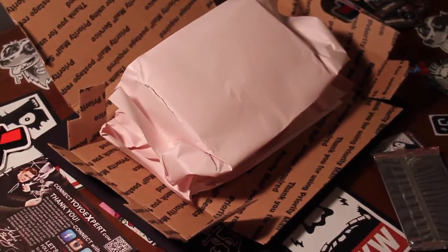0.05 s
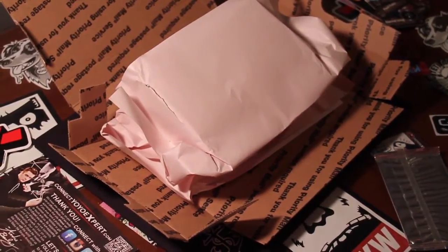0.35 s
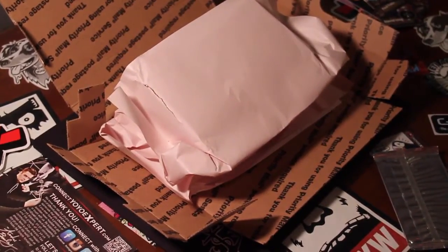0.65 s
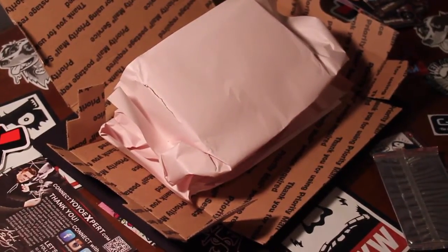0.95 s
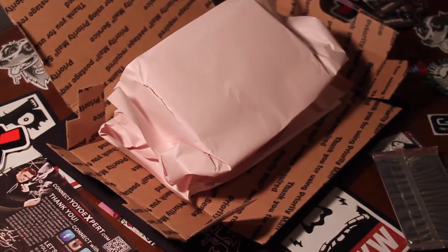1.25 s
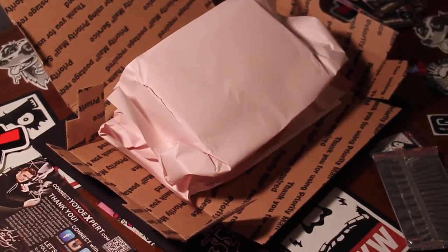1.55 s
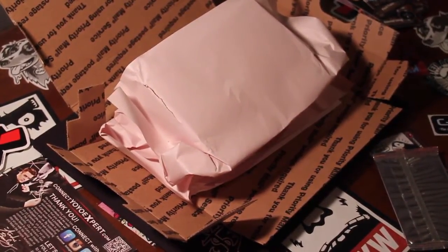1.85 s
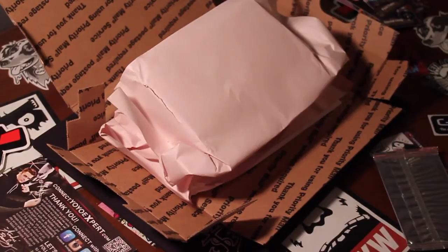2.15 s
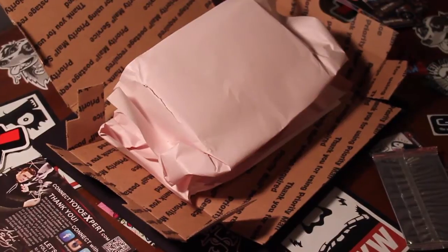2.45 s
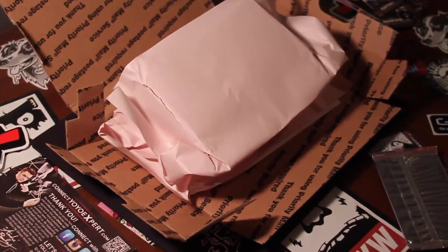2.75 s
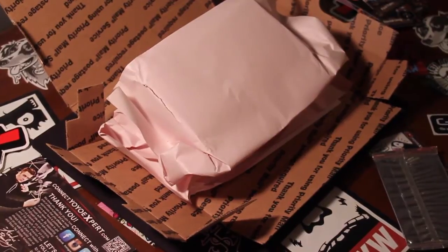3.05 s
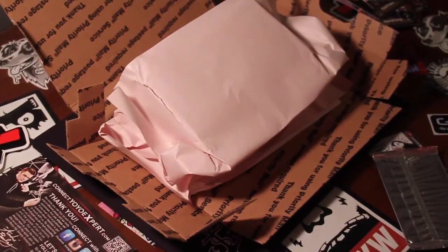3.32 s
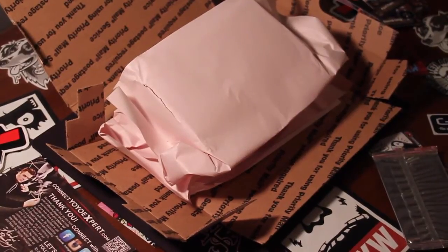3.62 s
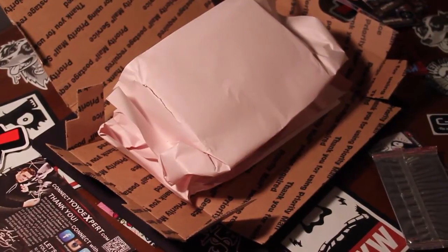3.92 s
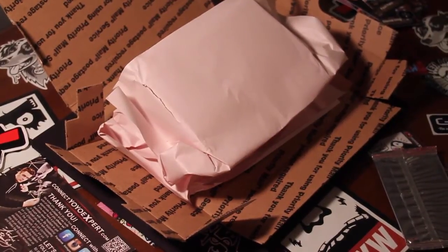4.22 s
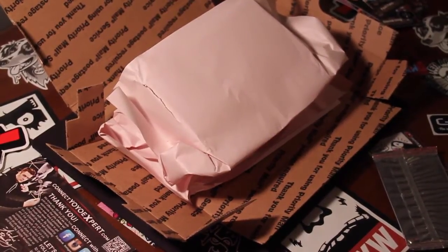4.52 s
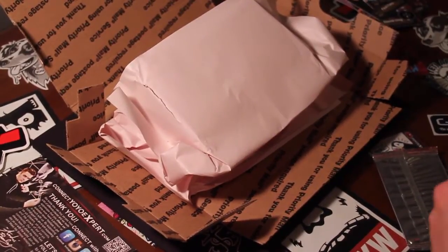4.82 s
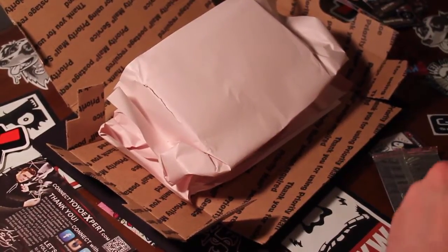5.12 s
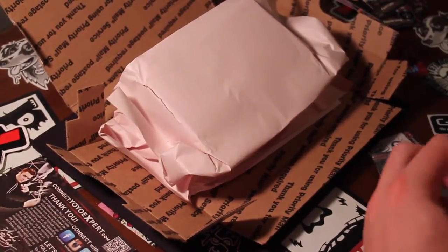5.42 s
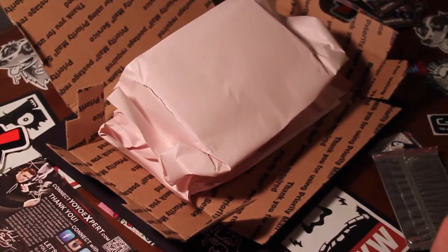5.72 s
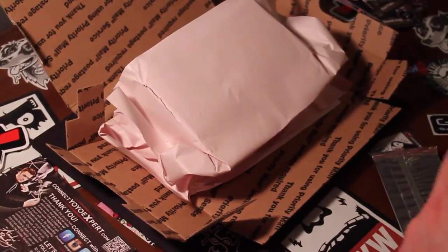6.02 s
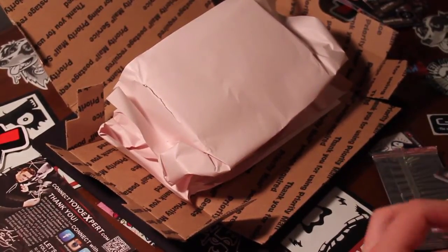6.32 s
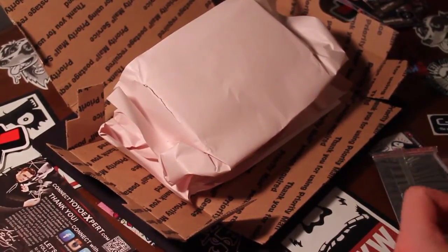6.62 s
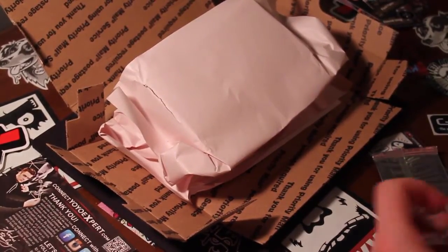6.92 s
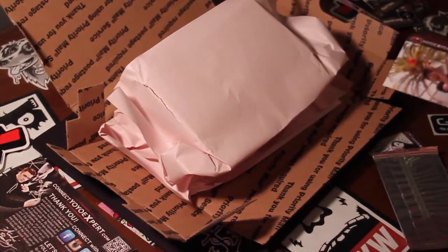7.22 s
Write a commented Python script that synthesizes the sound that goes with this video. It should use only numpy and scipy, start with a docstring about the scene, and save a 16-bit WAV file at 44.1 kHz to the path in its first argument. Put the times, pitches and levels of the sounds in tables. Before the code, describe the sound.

Stiff cards are handled close up, snapping, ticking and sliding over each other, sparse at first and then busy, in a quiet room.

```python
"""Stiff cards are picked up, tapped together and slid over each other above a table, heard close up.
Their edges snap free, their corners tick, and their faces rub in short strokes with a gritty hiss,
all made of tiny slips of fibre on fibre. Once a fingertip squeaks, and once the stack knocks on the table.
A small, quiet room with a soft steady whirr answers every click."""
import sys
import numpy as np
from scipy import signal
from scipy.fft import rfft, irfft
from scipy.io import wavfile
from scipy.ndimage import uniform_filter1d

SR = 44100
rng = np.random.default_rng(int(sys.argv[2]) if len(sys.argv) > 2 else 0)


def waveform_to_disk(signal):
    """Save audio, clipped to [-1, 1], as 16-bit WAV at the path in sys.argv[1]."""
    frames = np.transpose(np.atleast_2d(signal))
    scaled = np.clip(frames, -1, 1) * 32767
    samples = np.round(scaled).astype(np.int16)
    wavfile.write(sys.argv[1], SR, samples)


N = 320027
TIME = np.arange(N) / SR
TREBLE_LIMIT_HZ = 15950


def amp(db):
    """Turns decibels into a number to multiply a sound by."""
    return 10 ** (np.asarray(db) / 20)


def evened(x):
    """Scales a signal so that its average strength (rms) is 1."""
    return x / np.sqrt(np.mean(x ** 2) + 1e-20)


def level_at(points, hz):
    """Reads between the rows of a (frequency, level) table, giving each octave equal room."""
    row_hz, row_db = np.transpose(points)
    return np.interp(np.log(hz + 1), np.log(row_hz + 1), row_db)


def bump(hz, centre_hz, width_hz):
    """A peak of height 1 around the pitch at which something rings."""
    return 1 / (1 + (2 * (hz - centre_hz) / width_hz) ** 2)


def add(mix, start_s, sound):
    """Mixes a sound in at the given time."""
    part = mix[max(0, round(start_s * SR)):][:len(sound)]
    part += sound[:len(part)]


def resonate(x, hz, lift_db, sharpness):
    """Turns a sound up around one pitch, so that it rings there (or down, if the lift is negative)."""
    return x + (amp(lift_db) - 1) * signal.lfilter(*signal.iirpeak(hz, sharpness, SR), x)


def tinted(body, face, bass_db, treble_db):
    """Takes the bass from the stack's body, and the middle and treble from the card's face."""
    bands = [(body, 1200, "low", bass_db), (face, [1200, 6000], "band", 0), (face, 6000, "high", treble_db)]
    out = 0
    for sound, edge_hz, kind, db in bands:
        band = signal.butter(3, edge_hz, kind, fs=SR, output="sos")
        share = np.linalg.norm(signal.sosfilt(band, signal.unit_impulse(256)))  # its part of an even hiss
        out = out + evened(signal.sosfilt(band, sound)) * share * amp(db)
    return out


def short_burst(x):
    """Gives a burst of strength 1 the energy of 10 ms of sound at that strength."""
    return x * np.sqrt(SR / 100 / len(x))


def grit(shape, spread_db):
    """Tiny slips of fibre on fibre: mostly small, a few large."""
    return evened(rng.standard_normal(shape) * amp(spread_db * np.clip(rng.standard_normal(shape), -2, 2)))


def air(level_db=-52, whirr_hz=1000, whirr_db=11, hum_hz=580, hum_db=9):
    """The steady hiss of the room, with a narrow whirr and a faint hum in it."""
    # tone of the quiet room: (frequency [Hz], relative level [dB])
    room_tone = [(30, -20.5), (140, -11), (380, -14.5), (570, -12), (900, -6), (1350, -14.5), (2800, -18.5),
                 (16000, -25)]
    hz = np.fft.rfftfreq(N, 1 / SR)
    whirr = whirr_db * bump(hz, whirr_hz, width_hz=130)
    hum = hum_db * bump(hz, hum_hz, width_hz=14)
    colour = amp(level_at(room_tone, hz) + whirr + hum)
    return amp(level_db) * evened(irfft(rfft(rng.standard_normal(N)) * colour, N))


def room(x, tail_db=-8.5, bass_fade_s=0.6, treble_fade_s=0.35):
    """The small room stores the energy at each pitch and lets it die away as a wash of noise."""
    hz, t, spectrum = signal.stft(x, SR, nperseg=256)
    power = np.pad(abs(spectrum) ** 2, ((0, 0), (2, 0)))[:, :len(t)]  # the room answers two steps late
    fade_s = np.interp(hz, [0, TREBLE_LIMIT_HZ], [bass_fade_s, treble_fade_s])  # time to fall 60 dB
    kept_per_step = amp(-120 * t[1] / fade_s)
    stored = np.array([signal.lfilter([1 - kept], [1, -kept], p) for kept, p in zip(kept_per_step, power)])
    noise = signal.stft(rng.standard_normal(N), SR, nperseg=256)[2]
    tail = signal.istft(np.sqrt(abs(stored)) * noise / noise.std(), SR)[1][:N]
    return x + amp(tail_db) * tail


def echoes(x, bounce_s=0.0021, bounce_gain=0.11, scatter_db=-9, scatter_s=0.012, patterns=4):
    """Sound bounces off the table and scatters from things nearby; the pattern changes as cards move."""
    t, out = np.arange(SR // 20) / SR, x
    for k in range(patterns):
        # each pattern blends into the next, three times a second
        blend = np.cos(np.pi / 2 * np.minimum(abs((TIME * 3 - k) % patterns - 1), 1))
        scatter = rng.standard_normal(len(t)) * np.exp(-(t / scatter_s) ** 2 / 2) * (t > bounce_s)
        response = amp(scatter_db) * scatter / np.linalg.norm(scatter)
        delay_s = bounce_s * 2 ** rng.uniform(-0.25, 0.25)
        response[round(delay_s * SR)] += bounce_gain
        out = out + signal.oaconvolve(x * blend, response)[:N]
    return out


def cards_and_table(force, size=8192):
    """The cards and the table top ring with whatever shakes them, and so colour its sound."""
    # overall tone of the cards: (frequency [Hz], relative level [dB])
    card_tone = [(50, -31), (120, -23), (165, -21), (330, -12), (507, -11), (630, -11), (694, -7),
                 (1050, -6), (3850, 3), (7760, -4), (12000, -0.5), (14500, -2.5), (16000, -14.5)]
    # pitches at which the table top rings: (frequency [Hz], width [Hz], lift [dB])
    table_rings = [(129, 12, 7.5), (500, 55, 4), (714, 22, 7), (1135, 55, 6.5)]
    hz = abs(np.fft.fftfreq(size, 1 / SR))
    ring_db = sum(lift * bump(hz, centre, width) for centre, width, lift in table_rings)
    log_gain = np.log(evened(amp(level_at(card_tone, hz) + ring_db)))
    # build a filter that rings only after each push, never before it
    response = np.fft.ifft(np.exp(np.conj(signal.hilbert(log_gain)))).real
    return signal.oaconvolve(force, response[:size // 2])[:N]


def squeak(start_s=0.9, length_s=0.21, from_hz=11100, to_hz=13600, width_hz=650, stutter_db=5,
           level_db=-65):
    """A thin, stuttering whistle of skin on card that rises as the finger speeds up."""
    along, out = np.linspace(0, 1, round(length_s * SR)), np.zeros(N)
    hz = from_hz + (to_hz - from_hz) * along
    flutter_noise, grip_noise = rng.standard_normal((2, N))[:, :len(along)]
    flutter = signal.sosfilt(signal.butter(2, width_hz / 2, fs=SR, output="sos"), flutter_noise)
    stutter = amp(stutter_db * evened(uniform_filter1d(grip_noise, size=900)))
    whistle = np.sin(2 * np.pi * np.cumsum(hz) / SR)
    swell = np.sqrt(abs(np.sin(np.pi * along)))
    add(out, start_s, amp(level_db) * evened(flutter * stutter * whistle * swell))
    return out


def knock(start_s=3.5112, thud_db=-16, slap_db=-11, landing_s=0.0076, settle_s=0.0063, low_cut_hz=190):
    """The stack lands: the table thuds while the cards slap down in a short burst and lie still."""
    # ringing of the knocked table and stack: (frequency [Hz], relative level [dB], time to fall 60 dB [s])
    thud_tones = [(266, -10, 0.042), (527, 6, 0.012), (1240, 9, 0.01), (1830, -1, 0.061), (2350, 8, 0.017),
                  (3080, 8, 0.022)]
    t, thud, slap = np.arange(SR // 4) / SR, np.zeros(N), np.zeros(N)
    ring = sum(amp(db - 60 * t / fade_s) * np.sin(2 * np.pi * hz * t) for hz, db, fade_s in thud_tones)
    add(thud, start_s, -amp(thud_db) * ring)
    blows = rng.standard_normal(len(t)) * np.exp(-np.maximum(t - landing_s, 0) / settle_s)
    add(slap, start_s, amp(slap_db) * short_burst(tinted(blows, blows, bass_db=5, treble_db=-1)))
    low_cut = signal.butter(2, low_cut_hz, "high", fs=SR, output="sos")
    return signal.sosfilt(low_cut, room(thud + cards_and_table(slap), tail_db=-17))


def ticks(rise_s=0.00033, decay_s=0.0064, typical_hz=3000):
    """A corner or fingernail brushes past: a few dry slips, faintly coloured by where it touches."""
    # light touches on a card: (time [s], level [dB], treble [dB])
    touches = [(0.401, -37, 8), (0.672, -37.5, -9), (0.708, -44.5, -5), (0.777, -39.5, -14),
               (1.18, -26.5, 0), (1.189, -36, -13), (1.345, -41.5, -8), (1.404, -39, -17),
               (1.452, -44.5, 9.5), (1.781, -36.5, -12), (1.821, -46.5, 3), (2.817, -54, 14),
               (2.919, -46, -2), (3.101, -38.5, -7), (3.252, -19.5, -13), (3.34, -22, -9), (3.54, -20.5, 1),
               (3.82, -31.5, 12), (3.854, -29, -1), (3.88, -26.5, -10), (3.925, -31, -16),
               (3.964, -27.5, 2), (4.107, -21, -4), (4.18, -19, 0), (4.229, -22, -2), (4.251, -15, -4.5),
               (4.382, -33, 6), (4.454, -27, -5), (4.53, -25, -6), (4.614, -19, -5), (4.645, -24, 1),
               (4.753, -25.5, -2), (4.765, -19.5, 1), (4.816, -19.5, -1), (4.879, -25.5, 0.5),
               (4.901, -20, 2.5), (4.983, -22, 0), (5.144, -29, 3), (5.534, -28.5, 6.5),
               (5.548, -23.5, 2.5), (5.66, -35.5, 8.5), (5.809, -29.5, 1), (5.819, -22.5, 3.5),
               (6.37, -24.5, 1), (6.479, -26.5, 1), (6.49, -20.5, -0.5), (6.543, -26, -1.5),
               (6.575, -32.5, 5), (6.793, -26, -1), (6.828, -29, -9), (6.896, -26.5, 4.5),
               (7.232, -27.5, 2.5)]
    t, out = np.arange(SR // 20) / SR, np.zeros(N)
    pitches = typical_hz * 2 ** rng.uniform(-1.1, 1, len(touches))
    grits = grit((len(touches), len(t)), spread_db=4)
    for (start, db, treble_db), hz, fibres in zip(touches, pitches, grits):
        slips = fibres * np.minimum(t / rise_s, 1) * np.exp(-t / decay_s)
        face = resonate(slips, hz, lift_db=5, sharpness=2.1)
        add(out, start, amp(db) * short_burst(tinted(slips, face, bass_db=-3, treble_db=treble_db)))
    return out


def flex(x, patchy_db):
    """Bending cards change their tone in passing patches as the place where they touch shifts."""
    spectrum = signal.stft(x, SR, nperseg=256)[2]
    across_pitch = uniform_filter1d(rng.standard_normal(spectrum.shape), size=7, axis=0)
    patches = evened(uniform_filter1d(across_pitch, size=9, axis=1))
    return evened(signal.istft(spectrum * amp(patchy_db * patches), SR)[1][:N])


def rubbing(slow_judder_db=3, glide_judder_db=1, catches_per_s=200, catch_db=-6, glide_above_db=-20,
            attack_s=0.0076, release_s=0.012, low_cut_hz=290, gain_db=0.5):
    """Card slides on card: slow strokes judder and catch, while fast ones glide with a more even hiss."""
    # strokes of one face over another: (start [s], length [s], level [dB], swell from start to end [dB],
    # bass [dB], treble [dB], pitch turned up or down [Hz], lift at that pitch [dB])
    strokes = [(0, 0.055, -37.5, -7, 0.5, -2.5, 1840, 8), (0.072, 0.18, -45, -5, 13, -0.5, 2570, 5),
               (0.333, 0.047, -46.5, -3, -8, -1.5, 3550, 2), (0.418, 0.29, -55.5, -15, -2, 6, 6960, -4),
               (1.093, 0.14, -45.5, 11, -1, 2, 1400, 9), (3.035, 0.135, -52.5, 12, -6, 4.5, 13000, 4),
               (3.18, 0.046, -14.5, -4, 0.5, 2, 1680, 3.5), (3.237, 0.14, -30.5, 14, 4.5, -2, 5700, 0.5),
               (3.388, 0.24, -37.5, 3, 7, -10, 1310, 10), (3.793, 0.16, -43.5, -4, 9, 4, 2820, 5),
               (3.99, 0.31, -28.5, 0.5, 5, -4, 1630, 7), (4.347, 0.06, -25.5, -7, 0, -2.5, 1440, 17),
               (4.439, 0.39, -36, 5, 7.5, -7, 3770, -2), (4.97, 0.09, -30.5, 19, 3.5, -7, 2450, 0),
               (5.156, 0.038, -16.5, 11, 0.5, 0, 5350, 2.5), (5.203, 0.19, -20.5, -5.5, -3, 4, 5960, 3.5),
               (5.608, 0.13, -37, -6, 9.5, 2.5, 1440, 0), (5.857, 0.082, -24.5, 4.5, 3, 0, 2980, 14),
               (5.947, 0.082, -16, 7, -13, -3, 2600, 4.5), (6.034, 0.063, -16, 0.5, -3.5, -0.5, 4900, 6.5),
               (6.105, 0.13, -18, -1.5, 5, 1.5, 5050, 0.5), (6.418, 0.13, -31, -3, 8, 1.5, 6400, -4),
               (6.605, 0.26, -43, -27, 4, -1, 3600, 1), (6.854, 0.14, -28.5, 17.5, 6, -1.5, 5400, 0.5),
               (7.072, 0.063, -34.5, 0.5, 1, 5.5, 7060, 1.5)]
    judder = evened(uniform_filter1d(uniform_filter1d(rng.standard_normal(N), size=260), size=110))
    catches = evened((rng.random(N) < catches_per_s / SR) * np.clip(rng.standard_normal(N), -2, 2))
    fibres = flex(grit(N, spread_db=3), patchy_db=4)
    hiss = flex(grit(N, spread_db=3), patchy_db=1.8)
    out = np.zeros(N)
    for start, length, db, swell_db, bass_db, treble_db, hz, ring_db in strokes:
        span = slice(round(start * SR), round((start + length + 10 * release_s) * SR))
        t = TIME[span] - start
        along = np.clip(t / length, 0, 1)
        letting_go = np.exp(-np.maximum(t - length, 0) / release_s)
        force = np.minimum(t / attack_s, 1) * amp(db + swell_db * (along - 0.5)) * letting_go
        sticking = 1 / (1 + amp(db + treble_db - glide_above_db) ** 2)  # loud, bright strokes stick less
        crinkle = evened(fibres[span] * amp(slow_judder_db * judder[span])) + amp(catch_db) * catches[span]
        glide = hiss[span] * amp(glide_judder_db * judder[span])
        slips = np.sqrt(sticking) * crinkle + np.sqrt(1 - sticking) * glide
        face = resonate(slips, hz, ring_db, sharpness=3.8)
        add(out, start, force * tinted(slips, face, bass_db, treble_db))
    return amp(gain_db) * signal.sosfilt(signal.butter(1, low_cut_hz, "high", fs=SR, output="sos"), out)


def snaps(creep=0.26, creep_s=0.014, base_contact_s=0.0011, chatter=0.63, chatter_s=0.012, hollow_hz=490):
    """A card's edge creeps, lets go in a burst of slips, then rattles until the fingers still it."""
    # edges snapping free: (time [s], level [dB], bass [dB], treble [dB],
    # pitch around which the snap is boosted [Hz])
    edge_snaps = [(0.06, -23.5, -0.5, -6, 1270), (0.181, -27.5, 4.5, -26, 1800),
                  (0.19, -31, -2, -7.5, 1310), (0.468, -25, -13, -1, 7050), (0.898, -36, 4, -14, 1350),
                  (1.203, -25, -6, 2, 6900), (2.092, -20, 1.5, 1, 1700), (2.279, -27, -1.5, -14.5, 1770),
                  (3.181, -17, -7, 3, 6900), (3.225, -12.5, 0, -7, 1660), (3.391, -25, 5.5, -5, 3800),
                  (3.946, -24.5, 2, -9, 1300), (3.972, -19.5, 8, -3.5, 1340), (4.023, -11.5, -18, -5, 1630),
                  (4.069, -11.5, 0.5, -6.5, 1440), (4.078, -11.5, -3, -5, 1510), (4.085, -19, -9, 3, 1630),
                  (4.143, -17.5, -6, -3.5, 3860), (4.242, -10.5, -0.5, -6.5, 2250),
                  (4.282, -14, 1.5, 1, 1930), (4.332, -18.5, -3.5, -18, 1270),
                  (4.445, -19.5, -6, -19, 1850), (4.482, -16.5, 2.5, -5, 1450), (4.506, -13, 3, -3, 3170),
                  (4.561, -17.5, 3, -7, 1270), (4.571, -17.5, 8.5, -5, 1310), (4.596, -16, 3, 0.5, 3830),
                  (4.684, -18.5, -13, -4, 3950), (4.799, -13, 0.5, 0.5, 1390), (4.988, -16, -6, -3, 2490),
                  (5.012, -16, -2, -14, 3260), (5.026, -10.5, -17, -3.5, 2350),
                  (5.034, -15.5, -1.5, -1, 2330), (5.125, -19, -18, -9.5, 4100), (5.29, -14, 2, 0, 1250),
                  (5.689, -13, -9.5, -1.5, 5050), (5.882, -15, -0.5, -30, 3020), (5.9, -16.5, 9, 0.5, 4540),
                  (5.92, -14, -25, -37, 2950), (6.221, -13, 8, -6, 2010), (6.421, -18, 8.5, 0.5, 1310),
                  (6.642, -27, 12, 1, 1350), (6.657, -18.5, -3, -8.5, 5850),
                  (6.714, -30.5, 14.5, -22, 1460), (6.866, -24.5, 10.5, -2, 1300),
                  (6.956, -23, 1, -1, 5200), (6.974, -16.5, 4, -7, 1300), (7.145, -18.5, -2, -1, 1530),
                  (7.207, -22.5, 9, -5, 2830)]
    t, out = np.arange(2560) / SR - creep_s, np.zeros(N)  # the edge lets go at t = 0
    wobbles = rng.standard_normal((len(edge_snaps), len(t)))
    for (start, db, bass_db, treble_db, boost_hz), wobble in zip(edge_snaps, wobbles):
        contact_s = base_contact_s * 2 ** (-treble_db / 25)  # dull snaps last longer
        progress = np.maximum(t, 0) / contact_s
        creeping = creep * np.clip(1 + t / creep_s, 0, 1) ** 2 * (t < contact_s)
        burst = progress * np.exp(1 - progress)
        chattering = chatter * (1 - np.exp(-progress)) * np.exp(-(t / chatter_s) ** 2)
        rattle = evened(amp(4 * evened(uniform_filter1d(wobble, size=110))))
        slips = (burst + rattle * (creeping + chattering)) * grit(len(t), spread_db=4)
        # heavy snaps sound the hollow of the stack; dull ones get a bigger boost at their pitch
        body = resonate(slips, hollow_hz, lift_db=0.51 * max(bass_db, 0), sharpness=1.8)
        face = resonate(slips, boost_hz, lift_db=6 - 0.61 * treble_db, sharpness=4)
        add(out, start - creep_s, amp(db) * short_burst(tinted(body, face, bass_db, treble_db)))
    return out


def scene():
    """Snaps, ticks and rubbing sound in the room, with the knock, a faint squeak and the steady air."""
    handling = snaps() + ticks() + rubbing()
    in_room = cards_and_table(room(echoes(handling))) * amp(-2)
    return (in_room + knock() + squeak() + air())[None]


def record(dry):
    """Flattens any peak beyond full scale, then takes away the very highest treble."""
    low_pass = signal.firwin(511, TREBLE_LIMIT_HZ, window=("kaiser", 8), fs=SR)
    return signal.oaconvolve(np.clip(dry, -1, 1), low_pass[None], "same")


dry = scene()
out = record(dry)
waveform_to_disk(out)
```